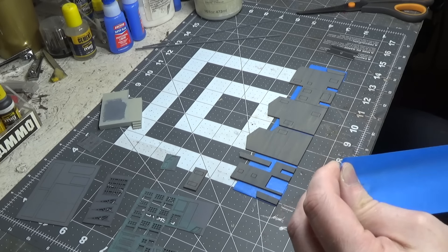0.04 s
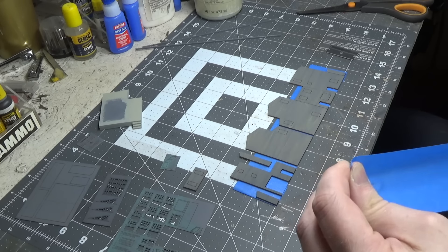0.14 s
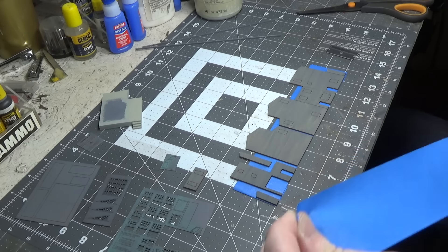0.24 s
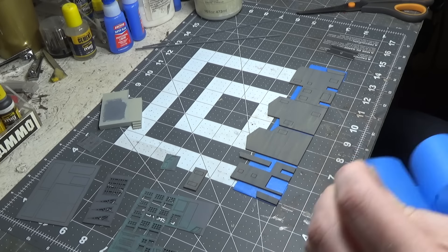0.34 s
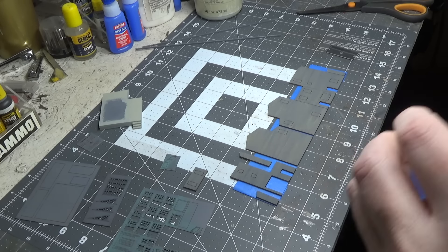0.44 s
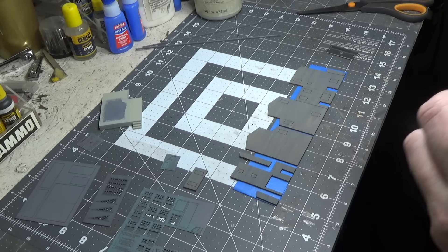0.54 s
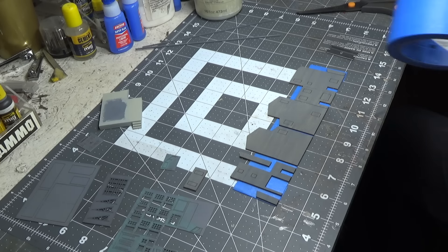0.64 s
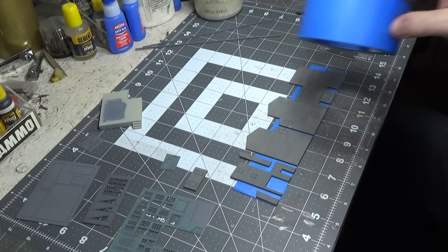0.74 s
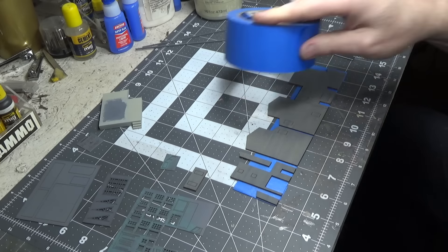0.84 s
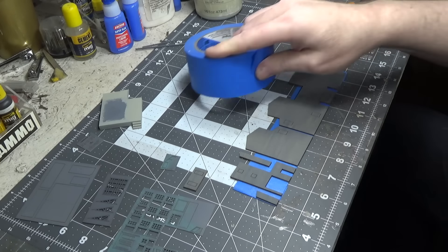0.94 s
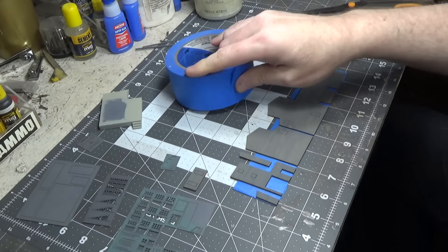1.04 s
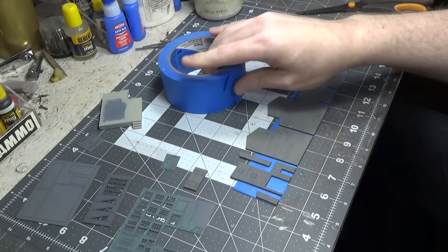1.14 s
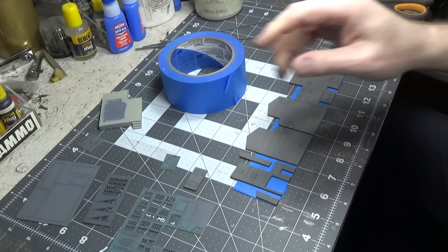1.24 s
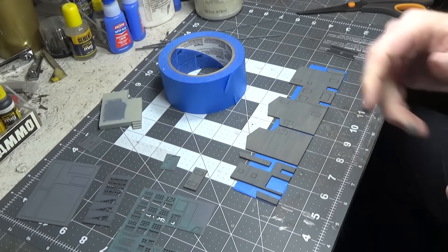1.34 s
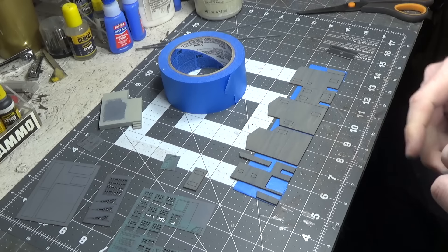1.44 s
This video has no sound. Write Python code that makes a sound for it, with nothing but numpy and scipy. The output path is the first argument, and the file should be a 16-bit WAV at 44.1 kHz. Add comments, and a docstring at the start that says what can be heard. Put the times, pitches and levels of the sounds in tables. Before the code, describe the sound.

A short, harsh rip of adhesive tape, then crinkly ticks and a roll tapping onto a desk

```python
"""Over steady hiss and rumble a roll of paper tape knocks in the hand (damped modes, noise); short ticks (damped
swings) and fingers sliding over tape (friction grains) follow. At 0.21 s tape is torn off close to the microphone:
a short clipped rip (glue crackle, low flap, jerks in bands of noise). More ticks and sliding follow. From 1.04 s
the roll lands on a desk in two taps (damped modes, dying noise, ticks), the desk sways (a low sine) and the roll
scuffs its mat (band noise). A small room answers the near sounds (convolution with dying noise)."""
import sys
import numpy as np
from scipy import signal
from scipy.fft import rfft, irfft, next_fast_len
from scipy.io import wavfile

SR = 44100
rng = np.random.default_rng(int(sys.argv[2]) if len(sys.argv) > 2 else 0)


def pcm_store(signal):
    """Save signal as 16-bit PCM."""
    levels = np.round(np.clip(np.atleast_2d(signal), -1, 1) * 32767)
    wavfile.write(sys.argv[1], SR, levels.astype(np.int16).T)


def to_linear_factor(level_db):
    """Convert decibel levels (scalar or array-like) to linear amplitude factors."""
    exponent = np.asarray(level_db, float) / 20
    return 10 ** exponent


N = 66150  # samples, 1.5 s

# room hiss: (frequency [Hz], relative density [dB])
HISS_TONE = [(88, -33.5), (150, -14.5), (594, -15), (630, -27), (814, -18.5), (1250, -23), (1790, -23),
             (2310, -23.5), (15300, -34.5), (16500, -39)]
# low rumble: (frequency [Hz], relative density [dB])
RUMBLE_TONE = [(12, -38.5), (20, -0.5), (75, -2.5), (130, -15.5), (253, -3.5), (300, -15), (390, -72)]
HISS_DB, RUMBLE_DB = -63.5, -64.5

# knocks of the roll in the hand: (time [s], ring gain [dB], rattle gain [dB])
KNOCKS = [(0.0175, -30, -31), (0.0402, -46, -46)]
# modes of the held roll: (frequency [Hz], relative level [dB], t60 [s])
HELD_MODES = [(248, -2, 0.04), (433, 1, 0.03), (870, -6, 0.02)]
# knock rattle: (frequency [Hz], relative density [dB])
KNOCK_TONE = [(300, -25.5), (600, -5.5), (1520, -12.5), (1910, -17), (2160, -12.5), (3490, -10),
              (12000, -52), (15600, -90)]
KNOCK_T60_S, KNOCK_RISE_S = 0.045, 0.00048
RING_VARY_DB = 1.5  # standard deviation per mode and blow

# short ticks: strip crinkles, small opening knocks, landing clicks and bounces:
# (time [s], gain [dB], pitch [Hz], life to exp(-2) [cycles])
TICKS = [(0.0181, -25.5, 5000, 3), (.041, -26, 726, 1.3), (0.0687, -39.5, 1500, 2),
         (.0705, -28.5, 650, 1.3), (0.328, -19.5, 1110, 0.96), (0.3288, -21, 2770, 4.2),
         (0.3635, -18, 870, 1.43), (0.3636, -16.5, 2200, 2.7), (0.4071, -21, 2500, 3.5),
         (0.4092, -26.5, 3050, 12), (0.406, -27, 9000, 7.1), (0.4099, -13.5, 8850, 3.3),
         (.4135, -24.5, 7300, 7.6), (.420, -33, 2500, 4), (0.555, -23.5, 2950, 15), (0.5553, -29, 5670, 12),
         (.556, -39.5, 635, 4.2), (.691, -35, 736, 1.56), (.728, -15.5, 1900, 0.77),
         (0.752, -24.5, 541, 0.8), (.789, -37.5, 6490, 1.5), (0.814, -52.5, 9200, 6.9),
         (0.841, -51.5, 9300, 6.2), (.922, -42, 7800, 3), (.761, -44.5, 10630, 5), (.867, -42, 9000, 5.5),
         (0.87, -43, 8940, 6.7), (.909, -39, 8830, 6.2), (0.906, -45.5, 1820, 15), (.929, -34, 8790, 5.3),
         (.957, -23.5, 7500, 2.06), (1.0393, -28, 650, 0.84), (1.05, -35, 2580, 4), (1.1874, -20, 3150, 6)]
TICK_HISS_RATIO, TICK_RISE_CYCLES, TICK_BAND_WIDTH = 0.3, 0.31, 2.0106  # width over centre

# room decay: (frequency [Hz], t60 [s])
ROOM_T60 = [(100, 0.4), (300, 0.18), (3000, 0.24), (8000, 0.17), (15000, 0.069)]
ROOM_DB, ROOM_DELAY_S = -15.5, 0.004

# finger slides, one list a stroke: (time [s], grain level [dB], dull body level [dB])
SLIDE = [
    [(.186, -59, -72), (.19, -48, -51), (.2, -59, -52), (.207, -44, -46), (.215, -45, -49)],
    [(.3, -82, -69), (.35, -60, -76), (.385, -53.5, -64), (.4055, -51, -54), (.412, -41.5, -39.5),
     (.43, -56, -62), (.47, -53.5, -65), (.483, -54, -89)],
    [(.483, -52, -76), (.487, -38.5, -58), (.51, -44.5, -81), (.54, -38.5, -81), (.556, -30, -50),
     (.562, -44, -56.5), (.6, -53, -89)],
    [(.6, -44.5, -68), (.612, -45, -75), (.662, -44, -86), (.69, -48, -56.5), (.7, -57, -64),
     (.72, -58, -78), (.73, -46, -60.5), (.758, -55, -60), (.772, -66, -72)],
    [(.78, -78, -72), (.789, -58.5, -71), (.83, -56.5, -63.5), (.87, -56, -70.5), (.89, -62.5, -63.5),
     (.93, -54.5, -64), (.953, -63.5, -70), (.959, -53, -55.5), (.99, -70, -85)],
    [(1.08, -66.5, -62), (1.097, -52, -50), (1.118, -55.5, -50), (1.13, -74, -59.5), (1.17, -54, -56),
     (1.215, -52.5, -55), (1.222, -80, -73)],
]
# friction grains: (frequency [Hz], relative density [dB])
SLIDE_TONE = [(400, -24.5), (620, -17), (1100, -12.5), (1500, -10), (1900, 1), (2400, -3), (3250, 3.5),
              (3900, -7), (5500, -3), (7000, -5.5), (8600, -3.5), (11000, -12), (15500, -18),
              (16500, -23.5)]
# dull rub of the hand: (frequency [Hz], relative density [dB])
BODY_TONE = [(41, -35.5), (70, -6), (322, -12), (406, -14.5), (732, -13), (853, -14), (1500, -22),
             (1950, -70)]
SLIDE_GRAINS_PER_S, SLIDE_SPREAD_DB = 19000, 1.5
STRAY_PER_S, STRAY_HZ, STRAY_WIDTH, STRAY_DB = 85, 9000, 0.33, -15.5  # level over the grains

# course of the tear: (time [s], crackle level [dB], low strip flap level [dB])
RIP = [(.2135, -62, -45.5), (.217, -31.5, -46.5), (.218, -11.5, -23), (.223, -11, -21.5), (.229, -16, -19),
       (.234, -7, -15), (.2385, -13.5, -8.5), (.245, -20, -19.5), (.251, -25, -35.5), (.252, -16, -28),
       (.257, -16, -26.5), (.266, -20.5, -25.5), (.275, -32.5, -41.5), (.3, -63.5, -53)]
# glue crackle: (frequency [Hz], relative density [dB])
RIP_TONE = [(240, -25), (400, -3), (948, -2.5), (1600, -7), (1860, -1), (2500, -2), (2950, -2.5), (3380, 2),
            (4010, -13), (5410, -1), (7400, -12.5), (8520, -7), (11000, -15.5), (15700, -22),
            (17000, -38.5)]
# strip flap: (frequency [Hz], relative density [dB])
FLAP_TONE = [(15, -35.5), (50, -8), (125, 0.5), (220, -9.5), (413, -11), (719, -15.5), (1170, -46)]
RIP_GRAINS_PER_S, RIP_SPREAD_DB = 20000, 1.5
# jerks of the tear: (time [s], length [s], gain [dB], centre [Hz])
JERKS = [(0.2187, 0.0018, -13.5, 3380), (0.2192, 0.001, -8.5, 2562), (0.2312, 0.0024, -9, 8130),
         (0.2332, 0.0019, -11.5, 5100), (0.2288, 0.00068, -9.5, 2750), (.235, 0.0024, -16.5, 3360),
         (.2518, 0.0029, -6.5, 8840), (.2522, 0.0044, -6.5, 5520), (0.2523, .002, -13.5, 770),
         (.2545, 0.0013, -7, 2460), (0.2551, 0.0035, -14.5, 3340), (0.265, 0.00086, -14, 2500)]
JERK_WIDTH, JERK_RISE_S = 0.11, 0.00021  # width over centre

# roll lands on the desk: (time [s], thud gain [dB], shell ring gain [dB], rim clack gain [dB], rattle gain [dB])
TAPS = [(1.0395, -26.5, -57, -22, -37.5), (1.1761, -11.5, -22, -40, -19)]
# desk modes: (frequency [Hz], relative level [dB], t60 [s])
DESK_MODES = [(76.6, -11, 0.22), (105, 1.5, 0.067), (134.6, -9.5, 0.18), (171.7, -12, 0.18),
              (287.4, -12, 0.12)]
# modes of the hollow roll: (frequency [Hz], relative level [dB], t60 [s])
SHELL_MODES = [(411.5, 10.5, 0.033), (485.5, -12, 0.065), (964, -8, 0.077)]
# rim modes: (frequency [Hz], relative level [dB], t60 [s])
RIM_MODES = [(662, -7, 0.016), (2500, 7.5, 0.0085), (3180, 0.5, 0.009), (4410, -24.5, 0.041)]
# landing rattle: (frequency [Hz], relative density [dB])
RATTLE_TONE = [(350, -11.5), (600, -9), (850, -10.5), (1300, -6), (1750, -13.5), (2200, -5.5),
               (2650, -11.5), (3350, -6), (3750, -24), (7840, -30), (16000, -43)]
# landing rattle decay: (frequency [Hz], t60 [s])
RATTLE_T60 = [(300, 0.17), (1000, 0.059), (3000, 0.066), (5000, 0.056), (10000, 0.031)]
RATTLE_RISE_S, THUD_RISE_S = 0.001, 0.0024
THUD_LAG_S = 0.0024  # the desk top gives a moment after the rim touches

# desk sway: (time [s], level [dB])
SWAY = [(1.08, -56), (1.156, -41.5), (1.206, -51), (1.258, -39), (1.29, -34.5), (1.326, -36),
        (1.366, -53.5), (1.412, -34.5), (1.456, -38), (1.5, -43.5)]
SWAY_HZ = 38.5

# roll scuffs the desk mat: (time [s], level [dB])
SCUFF = [(1.088, -61), (1.095, -50), (1.117, -51), (1.13, -57)]
SCUFF_HZ, SCUFF_WIDTH = 2860, 0.36  # width over centre

TOP_HZ, TOP_STOP_DB = 16600, 50  # stopband edge and depth
CLIP_TOP, CLIP_KNEE = 1.0, 10  # higher knee = harder corner


def unit(x):
    """Scale to rms 1."""
    return x / np.sqrt(np.mean(x ** 2) + 1e-20)


def along(points, hz):
    """Interpolate (frequency, value) points on a log axis."""
    f, v = np.transpose(points)
    return np.interp(np.log(hz + 1), np.log(f + 1), v)


def curves(rows, off=-120):
    """One value per sample for each column; off outside the rows."""
    s, *cols = np.transpose(rows)
    t = np.arange(N) / SR
    return [np.interp(t, s, c, off, off) for c in cols]


def coloured(x, tone):
    """Filter x by the gains of tone."""
    m = next_fast_len(len(x) + 8192)
    gain = to_linear_factor(along(tone, np.fft.rfftfreq(m, 1 / SR)))
    return irfft(rfft(x, m) * gain, m)[:len(x)]


def band(x, hz, width):
    """Pass x through one resonance; width over centre."""
    b, a = signal.iirpeak(min(hz, 0.45 * SR), 1 / max(width, 0.02), SR)
    return signal.lfilter(b, a, x)


def band_twice(x, hz, width):
    """Two equal resonances in series, for steeper skirts."""
    return band(band(x, hz, width), hz, width)


def crackle(rate, spread_db, tone):
    """Dense tiny impulses with scattered sizes, coloured, rms 1."""
    size = to_linear_factor(spread_db * rng.exponential(size=N)) * rng.standard_normal(N)
    fires = rng.random(N) < rate / SR
    return unit(coloured(size * fires, tone))


def dying(t60_points):
    """Half a second of noise; each frequency decays at its own t60."""
    hz, t, z = signal.stft(rng.standard_normal(SR // 2), SR, nperseg=128)
    decay = to_linear_factor(-60 * t / along(t60_points, hz)[:, None])
    return signal.istft(z * decay, SR, nperseg=128)[1][:SR // 2]


def ring(modes, t):
    """Sum of damped modes, their levels a little different at each blow."""
    out = np.zeros(len(t))
    for hz, db, t60 in modes:
        level_db = db + RING_VARY_DB * rng.normal()
        out += to_linear_factor(level_db - 60 * t / t60) * np.sin(2 * np.pi * hz * t)
    return out


def add(out, s, piece):
    """Mix a piece in at time s."""
    part = out[round(s * SR):][:len(piece)]
    part += piece[:len(part)]


def hush():
    """Steady room hiss and low rumble: two coloured noises."""
    hiss = unit(coloured(rng.standard_normal(N), HISS_TONE))
    rumble = unit(coloured(rng.standard_normal(N), RUMBLE_TONE))
    return to_linear_factor(HISS_DB) * hiss + to_linear_factor(RUMBLE_DB) * rumble


def knocks():
    """The held roll rings dully in damped modes, with a short noise rattle."""
    out, t = np.zeros(N), np.arange(SR // 8) / SR
    rise = 1 - np.exp(-t / KNOCK_RISE_S)
    for s, ring_db, rattle_db in KNOCKS:
        noise = unit(coloured(rng.standard_normal(len(t)), KNOCK_TONE))
        rattle = to_linear_factor(rattle_db - 60 * t / KNOCK_T60_S) * noise
        add(out, s, (to_linear_factor(ring_db) * ring(HELD_MODES, t) + rattle) * rise)
    return out


def ticks():
    """Each crinkle, small knock, click or bounce is a short damped swing with hiss, in a broad band."""
    out, t = np.zeros(N), np.arange(1024) / SR
    for s, db, hz, life in TICKS:
        hiss = unit(band(rng.standard_normal(len(t)), hz, 0.8))
        swing = np.sin(2 * np.pi * hz * t) + TICK_HISS_RATIO * hiss
        shape = np.exp(-2 * t * hz / life) * (1 - np.exp(-t * hz / TICK_RISE_CYCLES))
        add(out, s, to_linear_factor(db) * band_twice(swing * shape, hz, TICK_BAND_WIDTH))
    return out


def room(x):
    """Diffuse tail after a short gap; decay time depends on frequency."""
    tail = dying(ROOM_T60)
    delayed = np.pad(x, (round(ROOM_DELAY_S * SR), 0))
    return signal.fftconvolve(delayed, tail / np.linalg.norm(tail))[:N]


def slide():
    """Friction grains and stray crackles under each stroke, with the dull rub of the hand."""
    level, body = sum(to_linear_factor(curves(rows)) for rows in SLIDE)
    grains = crackle(SLIDE_GRAINS_PER_S, SLIDE_SPREAD_DB, SLIDE_TONE)
    impulses = rng.standard_normal(N) * (rng.random(N) < STRAY_PER_S / SR)
    stray = unit(band_twice(impulses, STRAY_HZ, STRAY_WIDTH))
    rub = unit(coloured(rng.standard_normal(N), BODY_TONE))
    return level * (grains + to_linear_factor(STRAY_DB) * stray) + body * rub


def rip():
    """Glue releases crackle and the strip flaps along the tear; each jerk is a burst in its own band."""
    level_db, flap_db = curves(RIP)
    out = to_linear_factor(level_db) * crackle(RIP_GRAINS_PER_S, RIP_SPREAD_DB, RIP_TONE)
    out += to_linear_factor(flap_db) * unit(coloured(rng.standard_normal(N), FLAP_TONE))
    t = np.arange(1024) / SR
    for s, length, db, hz in JERKS:
        fall = to_linear_factor(-18 * np.maximum(t / length - 1, 0))  # holds, then drops 18 dB per length
        shape = np.clip(t / JERK_RISE_S, 0, 1) * fall
        burst = unit(band(rng.standard_normal(len(t)), hz, JERK_WIDTH))
        add(out, s, to_linear_factor(db) * shape * burst)
    return out


def taps():
    """Each landing thuds the desk modes, rings the hollow roll and rim, and rattles."""
    out, t = np.zeros(N), np.arange(SR // 2) / SR
    rise = 1 - np.exp(-t / RATTLE_RISE_S)
    for s, thud_db, shell_db, rim_db, rattle_db in TAPS:
        rattle = coloured(dying(RATTLE_T60), RATTLE_TONE)
        rattle = to_linear_factor(rattle_db) * rattle / np.std(rattle[:256])
        thud = -to_linear_factor(thud_db) * ring(DESK_MODES, t) * (1 - np.exp(-t / THUD_RISE_S))
        shell = to_linear_factor(shell_db) * ring(SHELL_MODES, t)
        rim = to_linear_factor(rim_db) * ring(RIM_MODES, t)
        add(out, s + THUD_LAG_S, thud)
        add(out, s, (shell + rim + rattle) * rise)
    return out


def sway():
    """Very low swing of the desk: one sine under a level curve."""
    swing = np.sqrt(2) * np.sin(2 * np.pi * SWAY_HZ * np.arange(N) / SR)  # rms 1
    return to_linear_factor(curves(SWAY)[0]) * swing


def scuff():
    """Short rub on the mat: noise in one broad band."""
    rub = unit(band_twice(rng.standard_normal(N), SCUFF_HZ, SCUFF_WIDTH))
    return to_linear_factor(curves(SCUFF)[0]) * rub


def scene():
    """Near sources and their room answer, plus sway and hush; one channel."""
    near = knocks() + ticks() + slide() + rip() + taps() + scuff()
    return (near + to_linear_factor(ROOM_DB) * room(near) + sway() + hush())[None]


def top_cut(x):
    """Nothing passes above the cut-off."""
    return signal.sosfilt(signal.butter(12, 21850, fs=SR, output="sos"), x)


def record(dry):
    """The microphone ends at its band limit; the input clips loud peaks with a rounded knee."""
    lowpass = signal.cheby2(10, TOP_STOP_DB, TOP_HZ, fs=SR, output="sos")
    x = signal.sosfilt(lowpass, dry)
    clipped = x / (1 + np.abs(x / CLIP_TOP) ** CLIP_KNEE) ** (1 / CLIP_KNEE)
    return top_cut(clipped)


dry = scene()
out = record(dry)
pcm_store(out)
```